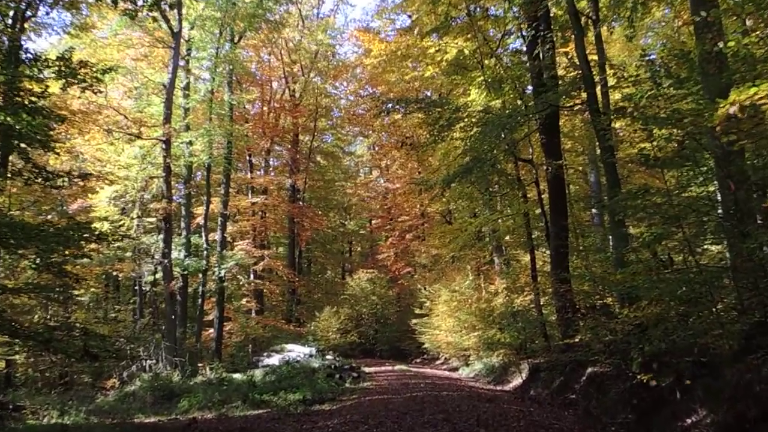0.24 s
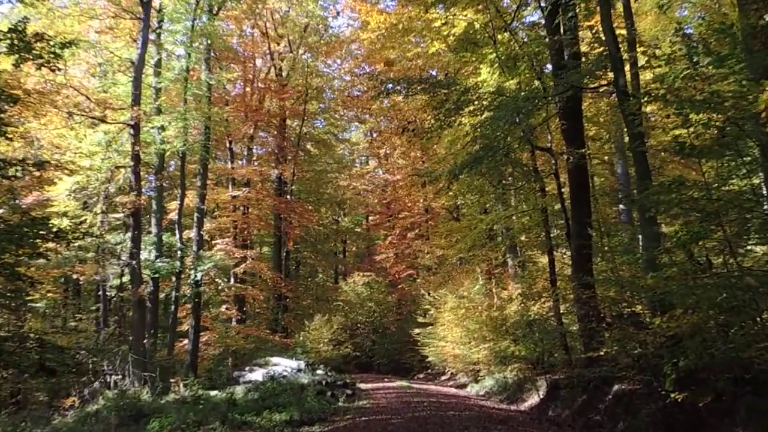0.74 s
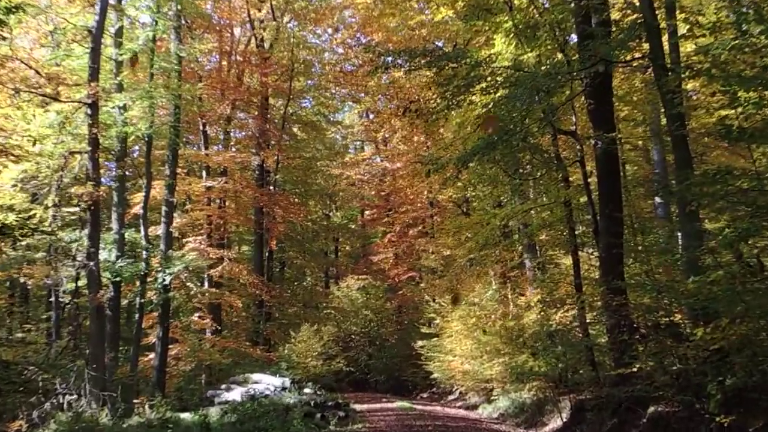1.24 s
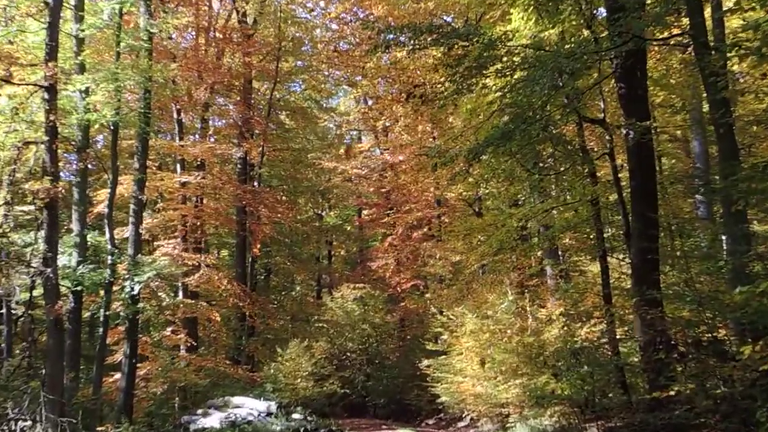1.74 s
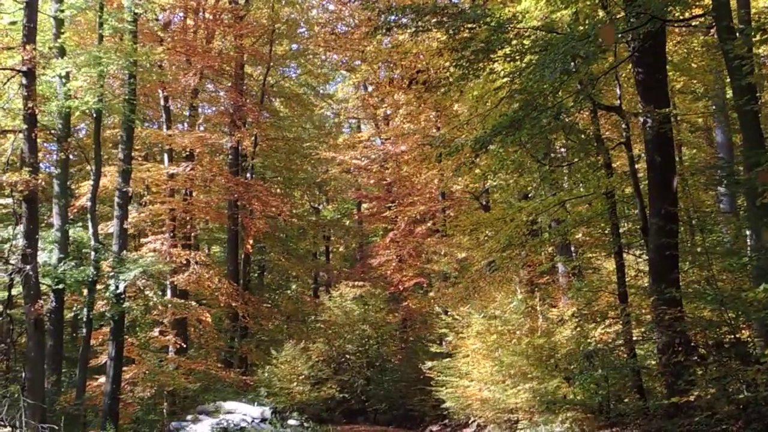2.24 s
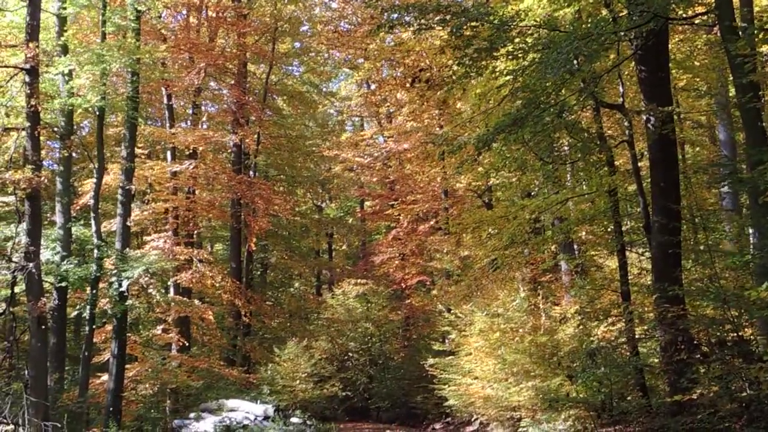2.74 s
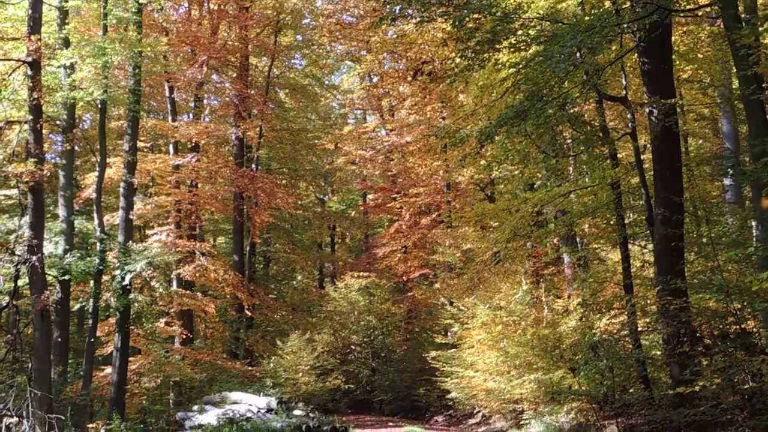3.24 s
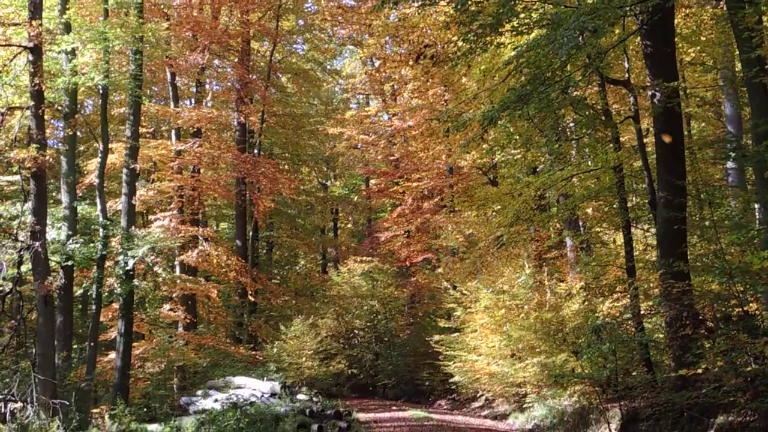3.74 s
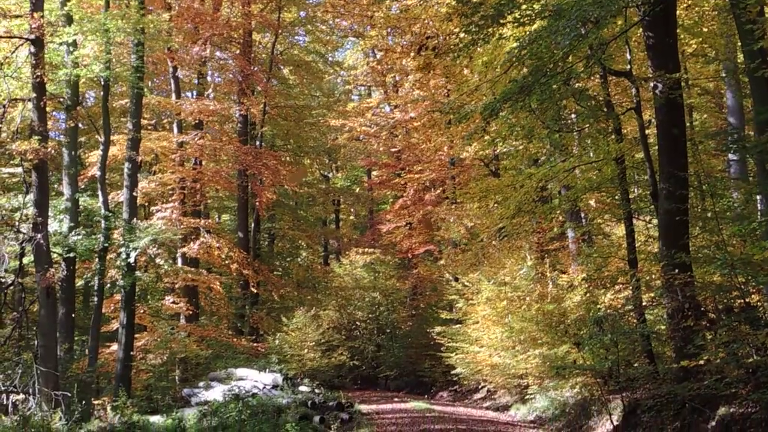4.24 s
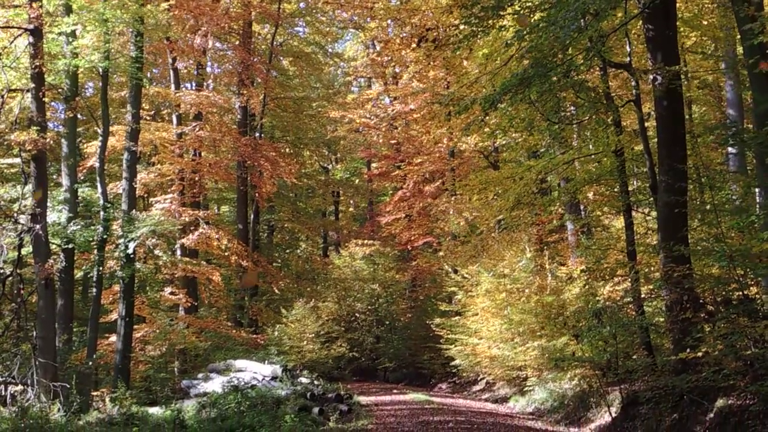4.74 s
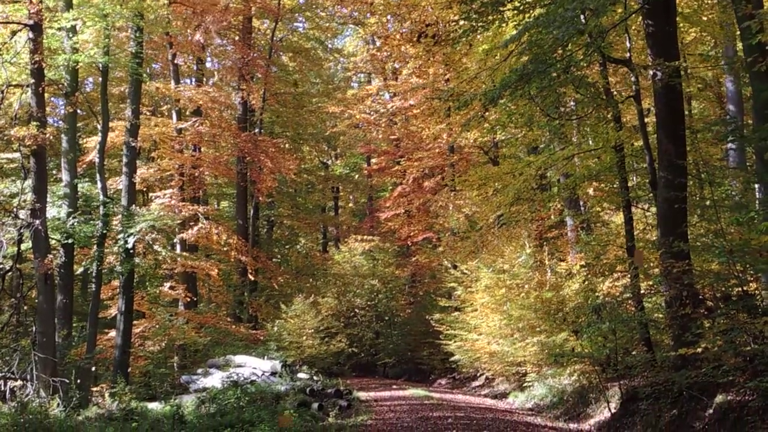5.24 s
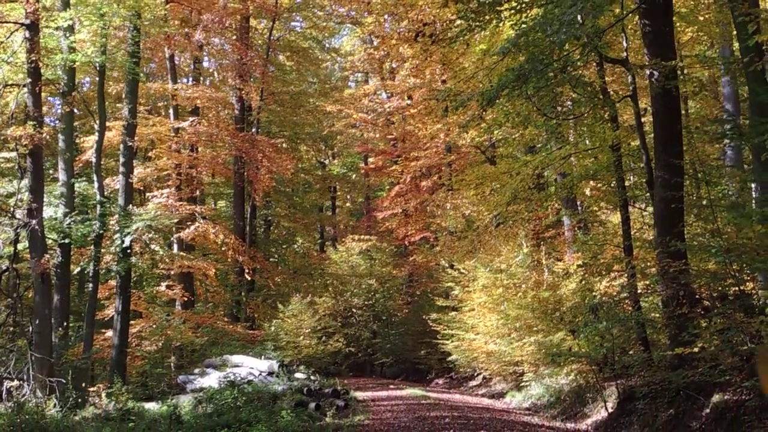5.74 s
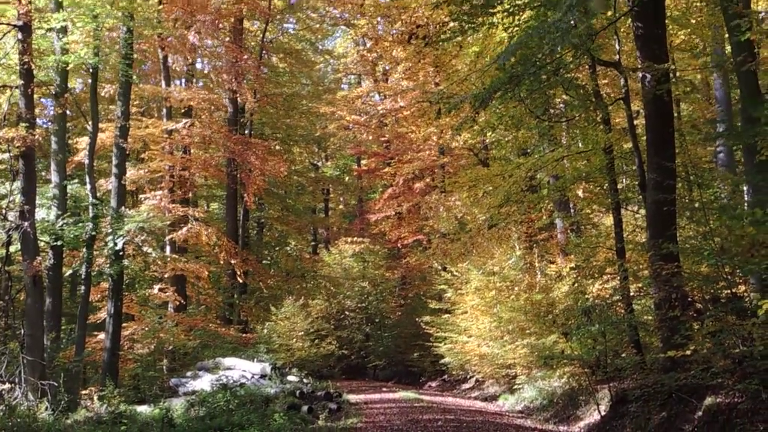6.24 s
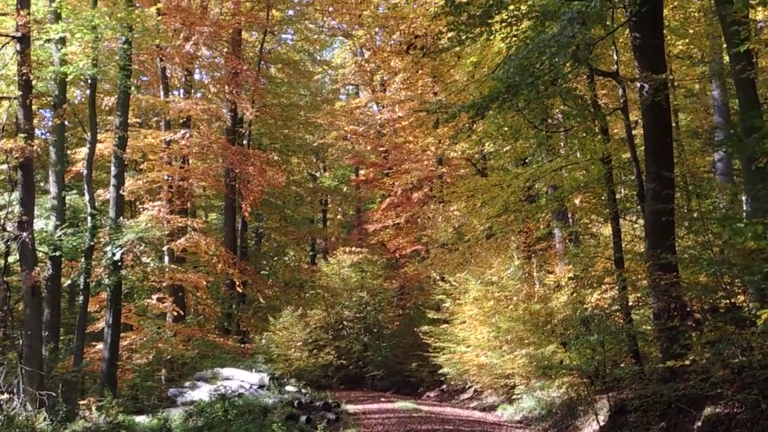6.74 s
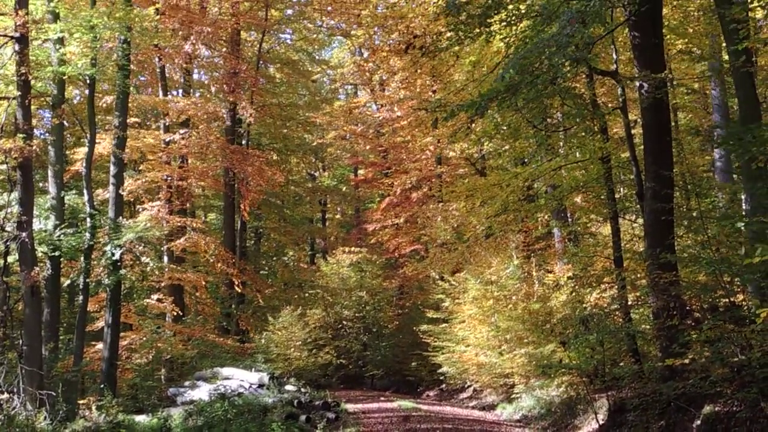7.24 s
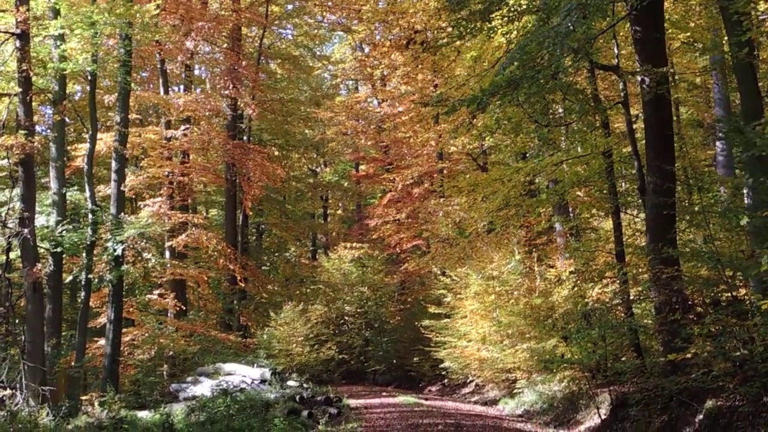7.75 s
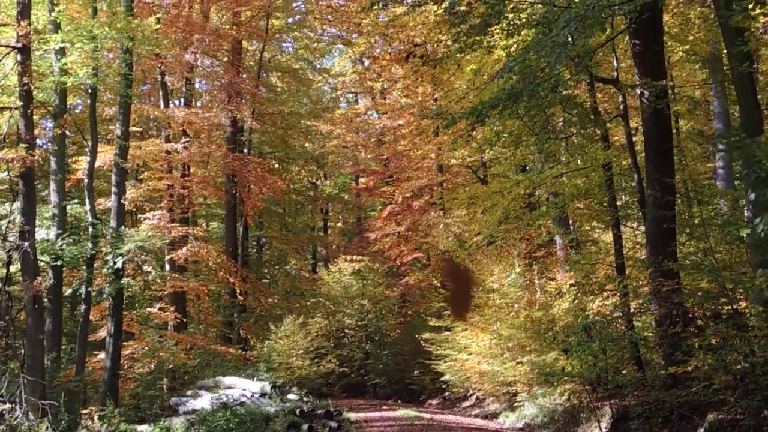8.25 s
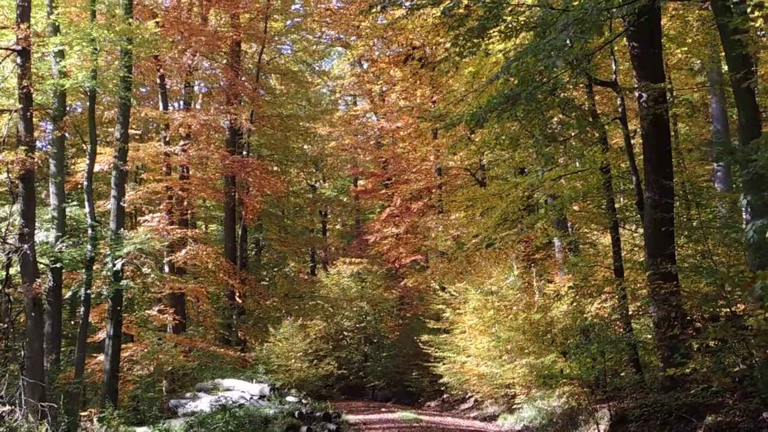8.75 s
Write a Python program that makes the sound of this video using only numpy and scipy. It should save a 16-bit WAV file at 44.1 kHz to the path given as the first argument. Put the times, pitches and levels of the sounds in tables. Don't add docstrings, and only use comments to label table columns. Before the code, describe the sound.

Dry leaves and nuts patter down through an autumn wood like light rain, with crisp close ticks, woody tocks and a faint distant hum.

```python
import sys
import numpy as np
from scipy import signal
from scipy.fft import rfft, irfft, next_fast_len
from scipy.io import wavfile
from scipy.ndimage import uniform_filter1d

SR = 44100
rng = np.random.default_rng(int(sys.argv[2]) if len(sys.argv) > 2 else 0)


def unload_audio(sound):
    columns = np.transpose(np.atleast_2d(sound))
    steps = np.round(np.clip(columns, -1, 1) * 32767)
    wavfile.write(sys.argv[1], SR, steps.astype(np.int16))


def volts(x):
    e = np.asarray(x, float) / 20
    return 10 ** e


N = 396013
FRAME = 1024
LEAF_HZ = 7900


def unit(x):
    return x / np.sqrt(np.mean(x ** 2) + 1e-20)


def along(points, hz):
    f, v = np.transpose(points)
    return np.interp(np.log(hz + 1), np.log(f + 1), v)


def curve(rows):
    return np.interp(np.arange(N) / SR, *np.transpose(rows))


def filtered(x, response):
    m = next_fast_len(N + SR // 2)
    return irfft(rfft(x, m) * response(np.fft.rfftfreq(m, 1 / SR)), m)[..., :N]


def diffuse(pair, spectrum):
    # f/Hz, correlation
    likeness = [(40, .955), (300, .973), (1270, .96), (2330, .9), (4200, .54), (6200, .28), (8300, .07),
                (10300, -.17), (12500, -.5), (15000, -.55)]

    def mid_side_gain(hz):
        angle = np.arccos(np.clip(along(likeness, hz), -1, 1)) / 2
        return volts(along(spectrum, hz)) * [np.cos(angle), np.sin(angle)]

    mid, side = filtered(pair, mid_side_gain)
    return np.array([mid + side, mid - side])


def rush(spectrum, patchy_db):
    z = signal.stft(rng.standard_normal((2, N)), nperseg=256)[2]
    field = uniform_filter1d(rng.standard_normal(z.shape[1:]), size=20, axis=0)
    field = unit(uniform_filter1d(field, size=8, axis=1))
    noise = signal.istft(z * volts(patchy_db * field), nperseg=256)[1][:, :N]
    return unit(diffuse(noise, spectrum))


def shower_db():
    # t/s, level/dB
    shower = [(0, -31), (.3, -30.5), (1, -30.7), (1.6, -30.5), (2.0, -31.7), (2.2, -30), (2.35, -28.5),
              (2.8, -28.5), (3.55, -28.5), (3.7, -31), (3.85, -29), (4.8, -29), (6, -29.5), (7.3, -29),
              (7.95, -29.5), (8.1, -32.5), (8.98, -32)]
    # t/s, level over shower/dB
    flurries = [(.3, 1), (.6, .7), (1.11, 3.5), (1.78, 2), (2.075, 2.8), (2.3, 1), (2.6, 2), (2.7, 2.5),
                (2.9, 4), (3.0, 0.5), (3.1, -0.7), (3.2, 0), (4.2, 0.2), (4.3, 0.2), (4.99, 1.2),
                (5.085, -1), (5.165, 2), (5.25, -0.2), (5.5, 1.2), (5.6, -0.2), (5.8, 1.2), (6.1, .8),
                (6.2, -0.5), (6.5, .7), (7.1, 0.2), (7.45, 0), (7.655, 1.8), (8.04, 1.2), (8.3, 0.5),
                (8.57, 1), (8.9, -1)]
    half_length_s = 0.041
    t = np.arange(N) / SR
    return curve(shower) + sum(db * np.exp(-((t - s) / half_length_s) ** 2) for s, db in flurries)


def crackles(rows, length_ms, leaf_hz, spiky_db, apart, shade_db):
    # f/Hz, width over pitch
    bodies = [
        (3020, 1.2),
        (1040, 1.8),
    ]
    # f/Hz, level/dB
    capsule = [(9500, 0), (12000, -4.5), (14500, -16), (16300, -28), (17000, -61)]
    leaf_width, port_lag_s, blow_delay_s = 0.61, 3 / SR, 0.000556
    t, hz = np.arange(FRAME) / SR, np.fft.rfftfreq(FRAME, 1 / SR)
    length_s = np.clip(length_ms, .5, 9)[:, None] / 1000
    decay = np.exp(-t / (.42 * length_s)) + .11 * np.exp(-t / .008)
    clump = (1 - np.exp(-t / .00012)) * decay
    draws = rng.standard_normal((len(rows), 4, FRAME))
    breaks = clump * volts(spiky_db * draws[:, 3])

    share = apart * hz / (hz + 4000)
    common = rfft(breaks * draws[:, 0])
    separate = rfft(breaks * draws[:, 1:3].swapaxes(0, 1))
    ports = common * np.sqrt(1 - share ** 2) + separate * share
    strength = np.sqrt(np.sum(breaks ** 2, axis=1, keepdims=True))
    blow = 0.011 / length_s ** 0.77 * strength * np.exp(-2j * np.pi * hz * blow_delay_s)

    sound = 0
    for k, (f, width) in enumerate([(leaf_hz[:, None], leaf_width), *bodies]):
        push = ports + k * blow
        damping = 1j * hz * width * f
        ring = push * (damping / (f * f - hz * hz + damping)) ** 2
        energy = np.sum(irfft(ring, FRAME) ** 2, axis=(0, 2))[:, None] / 2
        sound = sound + ring * volts(rows[:, k + 1:k + 2]) * np.sqrt((length_s + 0.00082) * SR / energy)

    side = np.array([1, -1])[:, None, None] * np.clip(rows[:, 5:6], -1, 1)
    far_port = np.exp(-1j * np.pi * hz * port_lag_s * (side + 1)) * volts(-shade_db * side * share)
    sound = irfft(sound * far_port * volts(along(capsule, hz)), FRAME)
    where = (np.round(rows[:, :1] * SR).astype(int) + np.arange(FRAME)).ravel()
    return np.array([np.bincount(where, c.ravel(), N + FRAME)[:N] for c in sound])


def ticks(rows):
    rows = np.array(rows)
    length_ms = 2.7 * volts(0.2 * (rows[:, 1] + 17.0))
    return volts(-2.0) * crackles(rows, length_ms, rows[:, 4], spiky_db=6.3, apart=.5, shade_db=3.5)


def rings(rows, cycles, boost_db):
    out, t = np.zeros(N + SR), np.arange(SR // 10) / SR
    for s, db, hz in rows:
        note = (1 - np.exp(-t * hz / .5)) * np.sin(2 * np.pi * hz * t)
        out[round(s * SR):][:len(t)] += volts(db + boost_db - 60 * t * hz / cycles) * note
    return out[:N]


def far_hum():
    # t/s, level/dB
    hum_level = [(0.0, -43.5), (0.63, -44.5), (1.0, -43.5), (1.33, -44), (2.03, -44.5), (2.58, -41.5),
                 (5.5, -42), (5.83, -42), (6.83, -42), (7.2, -41), (7.88, -43), (8.2, -44.5), (8.98, -46)]
    # f/Hz, level per Hz/dB
    hum_spectrum = [(12, -48), (20, -18), (65, 1), (113, -1.5), (209, 0), (536, -1.5), (1030, -4),
                    (1500, -16), (1950, -19), (3300, -120)]
    return volts(curve(hum_level) - 0.4) * rush(hum_spectrum, patchy_db=0.96)


def far_hiss():
    # f/Hz, level per Hz/dB
    hiss_spectrum = [(600, -21.5), (1000, -10.5), (1300, -4.5), (2100, -3), (3140, -1), (5110, -1.5),
                     (8500, 1), (9700, -0.5), (11000, -7), (12400, -13), (13800, -13), (14350, -18),
                     (14550, -57), (15200, -80)]
    return volts(shower_db() - 0.21) * rush(hiss_spectrum, patchy_db=1.21)


def patter(count, level_db, scatter_db):
    u = rng.random((count, 8))
    s = u[:, 0] * (N / SR)
    size_db = level_db + shower_db()[(s * SR).astype(int)] - scatter_db * np.log(1 - .93 * u[:, 1])
    colour_db = 12 * (u[:, 2:5] - .5) + [0, -7, -16]
    direction = np.sin(2 * np.pi * u[:, 6]) * 0.41
    rows = np.column_stack([s, size_db[:, None] + colour_db, u[:, 5], direction])
    length_ms, leaf_hz = 0.54 + 4 * u[:, 5], 6000 + 4000 * u[:, 7]
    return crackles(rows, length_ms, leaf_hz, spiky_db=-0.5, apart=0.44, shade_db=-1)


def far_taps(count, level_db, scatter_db, mid_hz, cycles):
    u, t = rng.random((count, 3)), np.arange(FRAME // 4) / SR
    start = (u[:, :1] * N).astype(int)
    hz = mid_hz * 3.0 ** (2 * u[:, 1:2] - 1)
    size_db = level_db + shower_db()[start] - scatter_db * np.log(1 - .9 * u[:, 2:])
    grains = volts(size_db - 60 * t * hz / cycles) * np.sin(2 * np.pi * hz * t)
    return np.bincount((start + np.arange(len(t))).ravel(), grains.ravel(), N + FRAME)[:N]


def leaf_cracks():
    # t/s, peak/dB, leaf f/Hz, direction (-1 left to 1 right)
    close_leaves = [(.0883, -24, 8700, .42), (.1315, -21, 7800, -1), (.416, -17.5, 8400, 0.84),
                    (.5134, -22, 8100, -0.69), (1.3073, -18, 8200, -.71), (1.3766, -22, 9000, -.66),
                    (1.7224, -25, 9100, -.94), (2.3857, -16.5, 6260, -0.78), (2.6184, -22, 8000, -.33),
                    (2.6965, -12.5, 9700, -.66), (2.9092, -8, 9550, -0.65), (2.9396, -19, 8300, -0.57),
                    (2.9598, -19, 8400, -.58), (3.7971, -22, 8500, -.83), (4.5724, -23, 8800, -.5),
                    (4.6477, -21, 8100, -0.69), (4.9775, -20, 8500, -0.75), (5.1907, -22, 7900, -0.58),
                    (5.498, -21, 9500, -.03), (5.5329, -21, 8900, -.75), (5.633, -27, 9700, -.77),
                    (5.9111, -22, 8800, -0.72), (6.0455, -23, 7800, -.25), (6.8315, -17, 9400, 0.76),
                    (8.306, -12.5, 9300, 0.43), (8.4504, -21, 7560, -.1), (8.91, -18.5, 7800, 0.44),
                    (6.7943, -20, 13800, .1), (6.8246, -10, 13800, 0.69), (2.3857, -22, 14000, -0.55)]
    # t/s, peak/dB, direction
    flecks = [(.4966, -26, -.33), (.7595, -27, -.33), (.8261, -32, -0.66), (1.437, -25, .67),
              (1.4497, -28, -.83), (1.8885, -30, .75), (3.873, -34, .5), (4.3422, -31, -.76),
              (5.2017, -26, -.5), (5.396, -30, .68), (5.4259, -29, .58), (6.056, -25, .5),
              (7.2022, -26, -.5), (8.1251, -29, .42), (8.4725, -28, -.77), (8.8005, -31, -.58),
              (2.533, -28, -.3), (2.5562, -21.5, -0.28), (2.625, -25, .3), (1.1015, -29, .2),
              (7.722, -26.5, -.3)]
    shell_db, ground_db = -19, -27
    leaves = [*close_leaves, *((s, db, LEAF_HZ, way) for s, db, way in flecks)]
    return ticks([(s, db, db + shell_db, db + ground_db, hz, way) for s, db, hz, way in leaves])


def rustles():
    # t/s, leaf crack/dB, shell snap/dB, length/ms, direction
    tears = [(0.105, -22, -39, 4.25, -1.1), (0.1594, -25.5, -28, 5.6, -.33), (.5892, -27, -33, 5.75, -.4),
             (.8024, -27, -43, 4.9, .08), (.948, -26, -33, 9, -0.86), (1.1217, -26, -29, 4.6, .67),
             (1.1318, -18, -37, 3.7, -0.71), (1.5434, -28, -35, 4.5, -0.082), (1.6335, -24, -38, 5.7, 0.86),
             (2.6425, -21, -29, 8.5, .75), (2.6513, -21, -36, 6.75, 0.71), (3.1165, -28, -31, 6, 0.074),
             (3.516, -32, -29.5, 7.6, .71), (5.1227, -19, -31, 6.9, -0.55), (5.1463, -25, -33, 9, -.61),
             (5.507, -27, -29, 5.7, .84), (6.1865, -30, -35, 3.8, .67), (7.1889, -23, -45, 3.7, -.67),
             (7.603, -24, -26.5, 7.8, 0.77), (7.609, -18.5, -34, 8.4, 0.72), (7.63, -21.5, -48, 9, .58),
             (8.2228, -29, -32, 6.1, -0.81), (8.238, -24, -33, 9, 0.54), (8.32, -25, -43, 7.2, .33)]
    ground_db = -7
    rows = np.array([(s, leaf, shell, shell + ground_db, ms, way) for s, leaf, shell, ms, way in tears])
    leaf_hz = np.full(len(rows), 8200.)
    return crackles(rows, rows[:, 4], leaf_hz, spiky_db=4.0, apart=.5, shade_db=-1)


def twig_snaps():
    # t/s, leaf crack/dB, shell snap/dB, direction
    glances = [(.1217, -24, -28, -1), (.346, -39, -29, .33), (.8134, -30, -31, -.5),
               (1.6824, -27, -28, -.33), (1.815, -27, -31, 0.42), (1.971, -29, -31, .58),
               (2.2921, -21.5, -28, -.33), (2.4403, -28, -30, 0.59), (3.19, -24, -29, -.41),
               (3.3409, -25, -33, .67), (3.563, -24, -28, .33), (3.9174, -38, -31, .08),
               (4.0468, -25, -31, -.58), (4.144, -38, -27, .33), (4.283, -37, -29, 0.74),
               (4.522, -35, -24, .17), (4.757, -40, -24, .17), (4.9041, -26, -32, .67),
               (5.2837, -27, -30, 0.35), (5.2972, -28, -28, .67), (5.327, -37, -29, .17),
               (5.6666, -34, -28, .03), (7.086, -34, -26, .67), (7.7083, -32, -35, -.08),
               (8.366, -36, -30, .17), (2.0419, -14, -22, -0.28), (4.9573, -10.5, -28, -.58),
               (6.7679, -17.5, -27, -0.18), (2.6967, -32, -31, -.4), (2.913, -23, -30, -0.72)]
    ground_db = -14
    return ticks([(s, leaf, shell, shell + ground_db, LEAF_HZ, way) for s, leaf, shell, way in glances])


def short_knocks():
    # t/s, peak/dB, f/Hz
    knocks = [(.3436, -22, 2100), (.7255, -24, 2420), (.8731, -28, 2600), (.8934, -24, 1300),
              (.9003, -25, 1200), (.918, -33, 420), (.925, -28, 620), (1.4175, -28, 2440),
              (1.9385, -29, 2420), (2.038, -24, 8500), (2.116, -23, 1500), (2.5565, -28, 900),
              (2.5735, -19, 1700), (2.6975, -22, 1500), (2.6975, -20, 4500), (2.912, -21, 1200),
              (3.5165, -20, 2900), (3.9165, -23, 3000), (4.4855, -27, 500), (5.3268, -23, 2300),
              (5.5015, -20, 1680), (5.5245, -24, 730), (5.7785, -24, 2340), (7.2845, -27, 900),
              (7.557, -24, 900), (7.605, -22, 1500), (7.712, -24, 2900), (7.822, -22, 3400),
              (7.861, -24, 3600), (8.036, -24, 1800), (8.305, -26, 2600), (8.4105, -27, 2420),
              (2.0419, -24, 14500), (2.3862, -28, 14500), (2.6972, -24, 14500), (2.9098, -20, 13500),
              (4.9575, -22, 14500), (8.3065, -24, 14500), (.4285, -26, 1900), (.3475, -23, 2600),
              (.351, -27, 2200), (.16, -25, 4600), (3.519, -23, 2300), (3.522, -26, 2800),
              (4.2105, -24, 3900), (4.214, -26, 2800), (4.2855, -25, 2000), (4.289, -27, 2700),
              (5.526, -22, 5300), (7.6075, -24, 2300), (7.603, -24, 5200), (4.25, -30, 520),
              (2.9135, -23, 3600), (7.606, -24, 4000), (8.4865, -31, 410), (8.6125, -28, 1920)]
    return rings(knocks, cycles=6, boost_db=7)


def shell_tocks():
    # t/s, peak/dB, f/Hz
    tocks = [(0.2036, -24, 1720), (0.3446, -18.5, 2400), (0.8729, -20, 1400), (1.3069, -18, 4960),
             (1.6811, -19, 5200), (3.5134, -19, 2200), (4.2068, -21, 3280), (4.2817, -18, 2360),
             (4.9884, -22, 3260), (5.3263, -23, 2140), (6.186, -21.5, 1530), (7.708, -22, 2650),
             (8.3649, -24, 2060), (8.4625, -25, 1520), (2.8589, -12, 2700), (2.8596, -11, 3770),
             (2.0427, -24, 5100), (.4185, -23, 3300), (2.3862, -20, 5600), (2.44, -22, 3500),
             (0.3462, -26, 3000), (0.893, -27, 2700), (2.5732, -21, 3500), (1.39, -28, 2900)]
    return rings(tocks, cycles=16, boost_db=4)


def nut_landings():
    # t/s, leaf crack/dB, shell snap/dB, ground knock/dB, direction
    nuts = [(.4278, -17, -27, -31, -.58), (.873, -42, -33, -36, -.61), (1.0486, -33, -42, -29, -.17),
            (1.112, -31, -23, -28, -.6), (1.7918, -26, -22, -32, -.17), (2.101, -31, -28, -31, 0.75),
            (2.8591, -8, -22, -26, 0.68), (3.0743, -26, -26, -32, 0.17), (3.2244, -26, -26, -31, .71),
            (3.2353, -18, -24, -29, -1.1), (3.35, -26, -30, -29, .33), (3.8216, -30, -29, -35, -.62),
            (4.0758, -28, -30, -32, .42), (4.208, -28, -21.5, -27, .42), (4.612, -23, -39, -34, .08),
            (4.9899, -28, -32, -32, .42), (5.5249, -16, -40, -26.5, -0.77), (6.2652, -33, -32, -30, .03),
            (6.7947, -28, -25, -29, .08), (7.138, -21, -38, -31, .5), (7.2187, -27, -22, -28, .33),
            (7.5558, -17, -26, -30, -0.32), (8.628, -32, -29, -36, -.67), (8.9504, -27, -41, -32, -.42)]
    return ticks([(s, leaf, shell, ground, LEAF_HZ, way) for s, leaf, shell, ground, way in nuts])


def litter_thuds():
    # t/s, peak/dB, f/Hz
    thuds = [(.8732, -22, 673), (.879, -26, 480), (.885, -29, 750), (.899, -30, 560), (.896, -31, 500),
             (.905, -33, 400), (2.637, -29, 524), (2.8585, -21, 490), (2.8592, -15, 1050),
             (3.146, -33, 431), (4.717, -38, 511), (5.9135, -28, 266), (5.911, -28, 141), (7.603, -29, 343),
             (8.2215, -28, 806), (8.222, -30, 1400), (7.5558, -27, 1000), (8.228, -31, 500),
             (1.075, -34, 450), (7.6045, -33, 900)]
    return rings(thuds, cycles=10, boost_db=2.5)


def shell_pings():
    # t/s, peak/dB, f/Hz
    pings = [
        (2.8601, -9, 6920),
        (2.8593, -8, 8690),
        (2.859, -13, 10300),
        (2.8602, -20, 14000),
        (2.0419, -18, 7500),
        (2.0427, -19, 10000),
        (8.3065, -18, 8700),
        (2.9098, -18, 8800),
        (2.6972, -20, 8500),
        (2.3862, -22, 6500),
    ]
    return rings(pings, cycles=45, boost_db=2)


def trunks(x):
    # f/Hz, t60/s
    decay = [(300, 0.16), (3000, 0.04), (10000, 0.1)]
    delay = 200
    out, hop = np.zeros((2, N + SR)), SR // 4
    for start in range(0, N, hop):
        hz, t, z = signal.stft(rng.standard_normal((2, SR // 4)), SR, nperseg=256)
        swell = np.clip(t / 0.019, 0, 1) ** 2
        fade = volts(-60 * t / along(decay, hz)[:, None])
        tail = signal.istft(z * swell * fade, SR, nperseg=256)[1]
        tail = tail / np.linalg.norm(tail[0])
        wet = signal.fftconvolve(x[None, start:start + hop], tail, axes=1)
        out[:, start + delay:][:, :wet.shape[1]] += wet[:, :N + SR - start - delay]
    return out[:, :N]


def scene():
    bed = far_hum() + far_hiss()
    small = patter(count=1100, level_db=-12, scatter_db=2.6)
    small = small + far_taps(count=700, level_db=-6, scatter_db=3.0, mid_hz=1100, cycles=5.0)
    near = leaf_cracks() + rustles() + twig_snaps() + nut_landings()
    near = near + short_knocks() + shell_tocks() + litter_thuds() + shell_pings()
    scatter = volts(-16.0) * diffuse(trunks(near[0]), [(300, -2), (3000, 0.96)])
    return bed + small + near + scatter


def roll_off(x):
    return signal.sosfilt(signal.butter(12, 16400, fs=SR, output="sos"), x)


def record(dry):
    # f/Hz, level/dB
    port_tilt = [(1000, -0.5), (4000, -0.2), (8000, 2), (12000, 2)]
    top_hz = 16600
    halves = np.array([[.5], [-.5]])
    mix = filtered(dry, lambda hz: volts(along(port_tilt, hz) * halves))
    mix = filtered(np.clip(mix, -1.05, 1.05), lambda hz: 1 / (1 + (hz / top_hz) ** 24))
    return roll_off(mix)


dry = scene()
out = record(dry)
unload_audio(out)
```